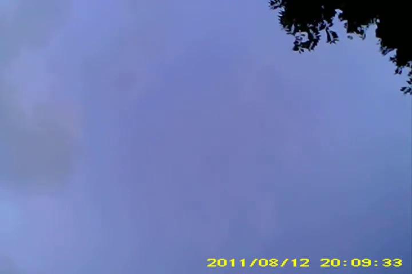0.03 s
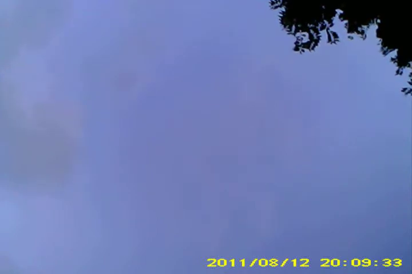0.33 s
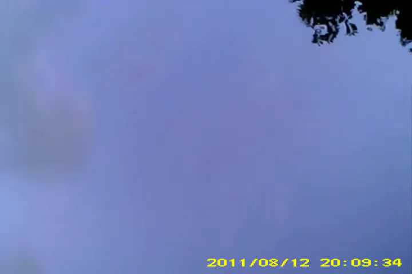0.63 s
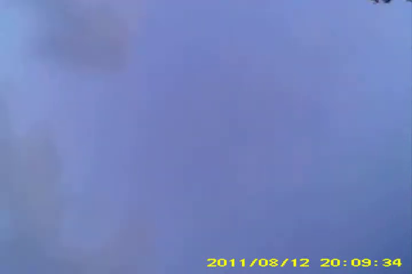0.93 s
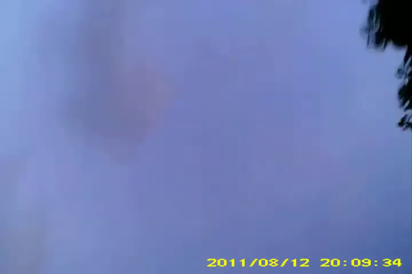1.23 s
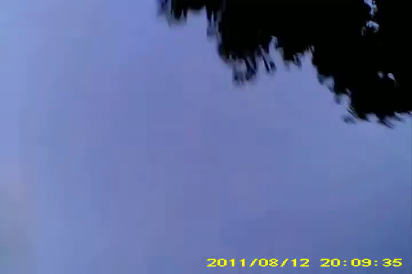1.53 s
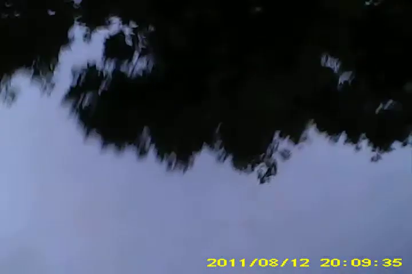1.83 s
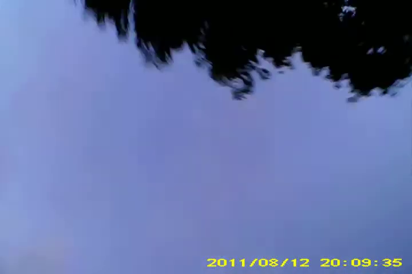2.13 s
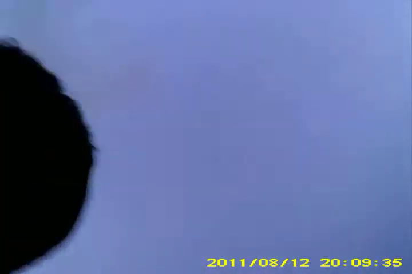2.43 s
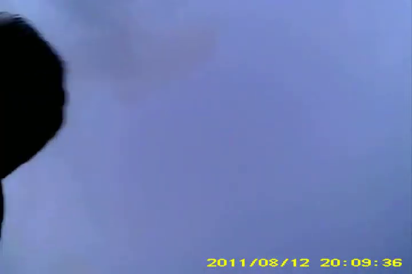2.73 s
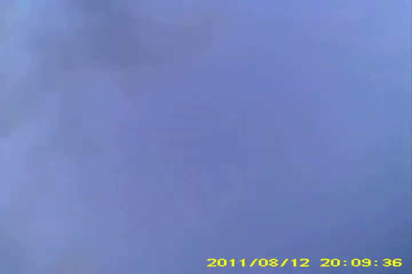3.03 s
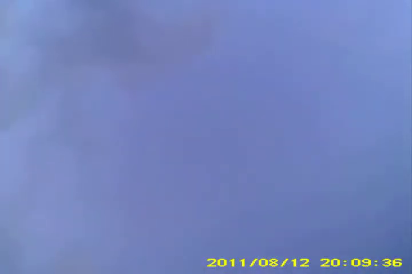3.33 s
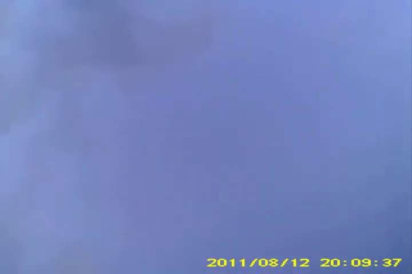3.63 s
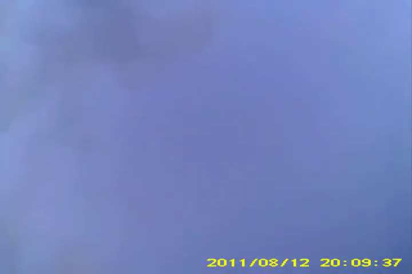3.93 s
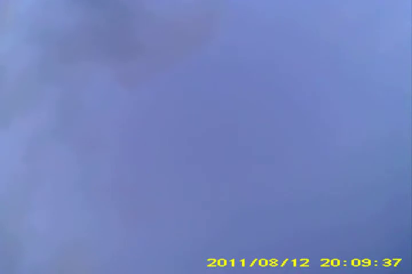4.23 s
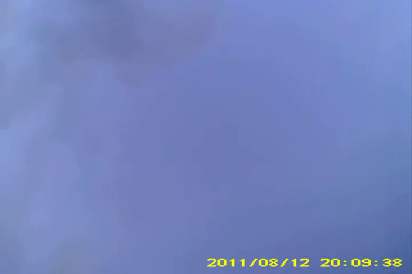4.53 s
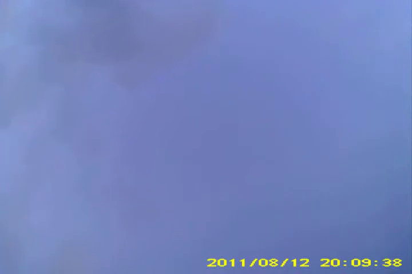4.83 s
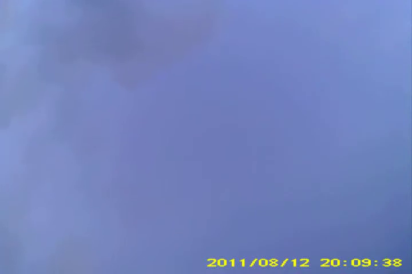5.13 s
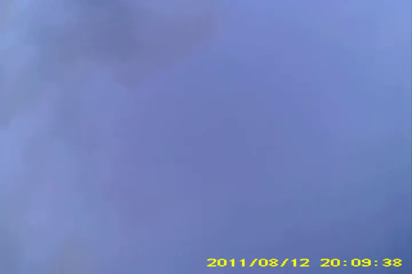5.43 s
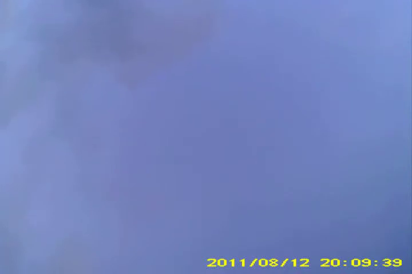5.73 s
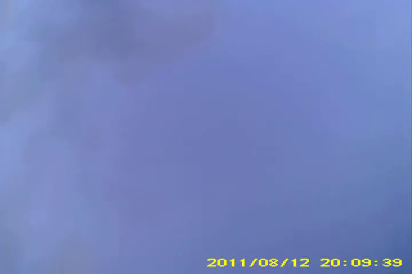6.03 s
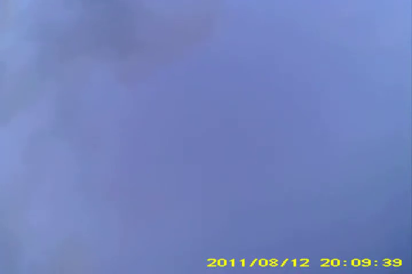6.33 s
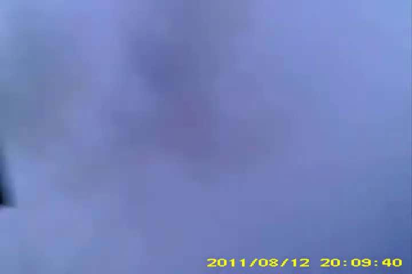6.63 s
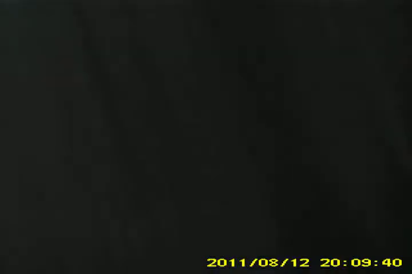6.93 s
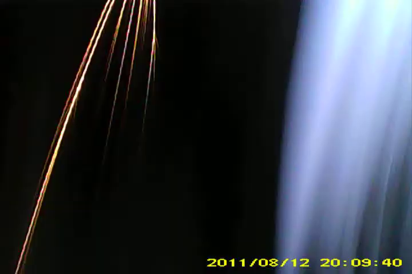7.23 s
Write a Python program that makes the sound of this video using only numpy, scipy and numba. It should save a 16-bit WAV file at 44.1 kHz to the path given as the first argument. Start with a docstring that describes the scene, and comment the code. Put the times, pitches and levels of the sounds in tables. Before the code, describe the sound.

A firework fuse flares close to a cheap microphone in the open air, over faint air noise and a distant low drone. Sharp pops pepper its hiss, then thin out, leaving a soft sizzle and a slowly swelling hollow tone. Suddenly the whistling rocket takes off, a harsh, distorted screech and roar that lasts under a second, cutting out briefly and weakening as it leaves.

```python
"""Outdoors, a whistling bottle rocket close to a cheap camera. The fuse catches, hisses and spits;
the flame creeps into the tube and rings it; the motor shrieks and roars away, with brief dips in level.
Soft air noise and a distant drone lie underneath. The camera rides its gain, overloads, and
samples so slowly that the shriek's overtones fold down into crossing glides."""
import sys
import numpy as np
from scipy import signal
from scipy.fft import rfft, irfft
from scipy.io import wavfile
from scipy.ndimage import map_coordinates
from numba import njit

SR = 44100
rng = np.random.default_rng(int(sys.argv[2]) if len(sys.argv) > 2 else 0)


def bounce(signal):
    """Save signal as a 16-bit WAV file at the path given by the first command-line argument."""
    frames = np.transpose(np.atleast_2d(signal))
    limited = np.clip(frames, -1, 1)
    pcm = np.round(limited * 32767).astype(np.int16)
    wavfile.write(sys.argv[1], SR, pcm)


N = 325017
T = np.arange(N) / SR
CATCH_S, LAUNCH_S = .218, 6.54
CAMERA_RATE_HZ = 8000

# tube resonances that colour the whistle: (frequency [Hz], gain [dB])
WHISTLE_COLOUR = [(1000, -10), (2100, 2), (3100, -13), (4150, -2), (4500, -0.5), (5300, 1), (5700, -8.5),
                  (6200, -17.5), (6750, -3), (7400, 3.5), (7900, -6.5), (8200, -16), (12000, -14.5)]
# exhaust spectrum: (frequency [Hz], gain [dB])
ROAR_COLOUR = [(30, 0), (150, 1.5), (600, 2.5), (1500, 4), (2500, 5), (3600, 4), (4000, 4)]

def motor():
    """The burning charge pulses in its tube: a shriek rich in overtones over the roar of the gas."""
    hz = whistle_pitch()
    whistle_gain, roar_gain = shriek_and_roar_gains()
    phase = 2 * np.pi * np.cumsum(hz * (1 + .0029 * walk(110))) / SR
    # harmonic 2 dominates each start; the wave steepens as the pitch settles
    steepness = np.interp(hz, [1140, 1220], [1, .25])
    # ground reflections smear each pulse; in free air the overtones line up into a spike
    smear_rad = np.interp(T, [6.95, 7.02], [.45, 0])
    whistle = 0
    for k in range(1, 14):
        gain = undb(np.interp(k * hz, *np.transpose(WHISTLE_COLOUR))) * (1 if k == 2 else steepness)
        whistle -= gain * np.cos(k * phase + smear_rad * k ** 2)
    roar = noise(ROAR_COLOUR) * undb(1.86 * walk(90))
    return whistle * whistle_gain * undb(2.4 * walk(78)) + roar * roar_gain


# whistle fundamental, before and after the restart: (time [s], pitch [Hz])
FIRST_SAG = [(6.575, 1112), (6.61, 1087), (6.67, 1063), (6.7, 1056), (6.78, 1049), (6.86, 1033),
             (6.955, 1018)]
SECOND_SAG = [(7.015, 1064), (7.037, 1048), (7.189, 1013), (7.257, 983), (7.36, 977)]
# whistle starts: (time [s], overshoot [Hz])
STARTS = [(6.527, 400), (6.972, 550)]

def whistle_pitch(settle_s=.014):
    """Pitch settles from above at each start, then sags as the cavity grows and the rocket leaves."""
    hz, = curves(list(FIRST_SAG) + list(SECOND_SAG))
    for start_s, overshoot_hz in STARTS:
        hz += (T >= start_s) * overshoot_hz * np.exp(-np.maximum(T - start_s, 0) / settle_s)
    return hz


# stretches of shriek and roar: (time [s], length [s], whistle [dB], roar [dB], fade [dB/s])
STRETCHES = [(6.528, 0.022, 10.5, 1.5, -5), (6.564, 0.38, 9.5, 10, 24), (6.957, 0.145, 1.5, 12.5, 94),
             (7.154, 0.05, -6.5, -6, 53), (7.244, 0.13, -5.5, -3.5, 5)]

def shriek_and_roar_gains(ignition_s=6.443, build_db_per_s=200, attack_s=.0032, release_s=.0049):
    """Gas builds up, then shriek and roar are heard in stretches, with brief dips between them."""
    started = T >= STRETCHES[0][0]
    building = (T > ignition_s) & ~started
    whistle, roar = started * undb(-15.5), started * undb(-10.5)  # floor of the dips
    roar += building * undb(-14 + build_db_per_s * building * (T - ignition_s))
    for start_s, length_s, whistle_db, roar_db, fade_db_per_s in STRETCHES:
        age_s = np.maximum(T - start_s, 0)
        envelope = np.minimum(age_s / attack_s, 1) * undb(-fade_db_per_s * np.minimum(age_s, length_s))
        envelope *= np.exp(-np.maximum(age_s - length_s, 0) / release_s)
        whistle = np.maximum(whistle, envelope * undb(whistle_db))
        roar = np.maximum(roar, envelope * undb(roar_db))
    return whistle, roar


# loud powder spits: (time [s], level [dB], pitch [Hz], length [ms])
SPITS = [(.161, -6, 495, 2.9), (0.626, 7, 1500, 6.4), (0.829, -7, 1670, 11), (.928, 6.5, 1294, 4.26),
         (0.985, 3.5, 1350, 6), (1.078, 4.5, 1120, 2), (1.105, 6, 1400, 3.1), (1.162, 4.5, 1060, 3.8),
         (1.203, -1, 570, 6), (1.213, 12.5, 2100, 1.66), (1.457, 8, 1580, 3.6), (1.474, 1, 1660, 5.8),
         (1.522, 7.5, 1060, 7.6), (1.569, 2.5, 2400, 4.7), (1.601, -1, 1590, 4.7), (1.68, 13.5, 1860, 1.7),
         (1.708, 6, 1800, 21.5), (1.739, 8, 1920, 18.5), (1.771, 6, 2000, 11), (1.819, 1, 1750, 6.5),
         (1.848, 3.5, 1700, 8.2), (1.873, 8, 1780, 3.8), (1.916, 9, 1280, 4.7), (1.966, 5, 1090, 4),
         (1.985, 10, 1140, 5.8), (2.033, 1, 1710, 28), (2.063, 6, 1690, 6), (2.074, 6.5, 690, 9.3),
         (2.169, 9.5, 1810, 2.4), (2.244, 2, 2000, 7.2), (2.323, 5, 1060, 9.2), (2.333, 13, 1570, 3.05),
         (2.358, 6, 1760, 9), (2.483, 7.5, 1470, 3.9), (2.545, 0.5, 2180, 4.1), (2.558, 8.5, 1500, 3),
         (2.771, 6.5, 1430, 2.2), (3.344, -0.5, 1500, 7), (3.376, 2, 1700, 4), (4.56, -16, 1600, 5.7),
         (5.9, -8.5, 1500, 11), (6.208, -5.5, 1500, 3.6)]

def spits(sputter_from_s=.9, sputter_to_s=2.85, crackles_per_s=18):
    """Powder pops in the fuse: loud spits, plus faint random crackles while it sputters."""
    span_s = sputter_to_s - sputter_from_s
    draws = rng.random((int(crackles_per_s * span_s), 3))
    crackles = [(sputter_from_s + when * span_s, -12 + 3 * size, 1500 * 2 ** (pitch - .5), 8)
                for when, size, pitch in draws]
    out = np.zeros(N)
    for start_s, db, hz, length_ms in SPITS + crackles:
        pop, i = spit(hz, length_ms), int(start_s * SR)
        out[i:i + len(pop)] += pop * undb(db)
    return out


# hollow launcher modes: (frequency [Hz], T60 [s], level [dB])
LAUNCHER_MODES = [(472, .16, -25), (360, 0.054, -26), (1210, 0.084, -30.5)]

def spit(hz, length_ms, width_hz=530, attack_s=.002, ceiling=1.54):
    """One grain goes off: a ragged, saturating puff with a sputtering tail rings the launcher."""
    t = T[:8192]
    burst = lowpass(rng.standard_normal(len(t)), 3120, order=4)
    burst = burst - lowpass(burst, 260)
    puff = unit(resonate(burst, np.full(len(t), float(hz)), width_hz)) + .51 * unit(burst)
    sputter = undb(8.1 * unit(lowpass(rng.standard_normal(len(t)), 230)))
    flame = np.exp(-(t * 1000 / length_ms) ** 2.6) + .074 * sputter * np.exp(-t / .014)
    pop = ceiling * np.tanh(.74 * puff * flame / ceiling) * (1 - np.exp(-t / attack_s))
    for mode_hz, t60_s, mode_db in LAUNCHER_MODES:
        detuned_hz = mode_hz * (1 + .034 * rng.standard_normal())
        pop += np.sin(2 * np.pi * detuned_hz * t) * undb(mode_db - 60 * t / t60_s)
    return pop


# fuse burn: (time [s], hiss [dB], rumble re hiss [dB], sizzle re hiss [dB])
FUSE_LEVELS = [(.28, -2, -14.5, -6), (.45, -3.5, -12, -6.5), (.64, -10, -14.5, -5), (.85, -15, -15.5, -4.5),
               (1.4, -17, -14.5, -4.5), (2.0, -10.5, -18, -9.5), (2.55, -17, -20, -7.5),
               (2.9, -16.5, -19, -4.5), (3.4, -17.5, -12.5, -2), (3.8, -20.5, -10.5, 3),
               (4.55, -19.5, -13.5, 3), (4.95, -19.5, -11.5, -5), (5.4, -22.5, -12.5, -6),
               (5.8, -25, -20, -3.5), (6.4, -21, -14, -1.5)]
# jet spectrum before the band split: (frequency [Hz], gain [dB])
JET_COLOUR = [(15, -40.5), (25, -11), (91, -10), (184, -10), (287, -8.5), (780, -3.5), (944, -4.5),
              (1050, -2.5), (1510, -5), (1820, 0), (2300, -9), (3100, -5), (3450, 0.5), (4000, 0.5),
              (5200, -41.5), (8800, -120)]

def fuse(flare_db=4, flare_s=.054):
    """A fluttering gas jet that flares as it catches: low rumble, mid hiss, top sizzle."""
    hiss_db, rumble_db, sizzle_db = curves(FUSE_LEVELS)
    jet = noise(JET_COLOUR)
    rumble, below_sizzle = lowpass(jet, 340), lowpass(jet, 3030, order=8)
    hiss, sizzle = below_sizzle - rumble, jet - below_sizzle
    gas = unit(hiss) + unit(rumble) * undb(rumble_db) + unit(sizzle) * undb(sizzle_db)
    burning = np.clip((T - CATCH_S) / .006, 0, 1) * np.clip((LAUNCH_S - T) / .02, 0, 1)
    catch_db = flare_db * np.exp(-((T - CATCH_S) / flare_s) ** 2)
    flutter_db = walk(34) + .6 * walk(360)
    return gas * burning * undb(hiss_db + catch_db + flutter_db)


# ring of the tube's mouth: (time [s], resonance [Hz], level [dB])
TUBE_RING = [(3.6, 1500, -24.5), (4.6, 1480, -22.5), (4.9, 1572, -19), (5.3, 1573, -15.5), (5.9, 1552, -12),
             (6.42, 1530, -11.5), (6.49, 1737, 0), (6.54, 1810, -5)]

def tube(width_hz=380., ceiling_re_rms=3.1):
    """The flame blows across the tube and rings its cavity in flutters, too weakly to lock into a tone."""
    hz, db = curves(TUBE_RING)
    ring = resonate(resonate(rng.standard_normal(N), hz, width_hz), hz, width_hz)
    ring = unit(ring * undb(2 * walk(36)))
    ring /= (1 + (np.abs(signal.hilbert(ring)) / ceiling_re_rms) ** 4) ** (1 / 4)  # saturation
    flame_inside = np.clip((T - 2.6) / .23, 0, 1) * np.clip((LAUNCH_S - T) / .01, 0, 1)
    return unit(ring) * flame_inside * undb(db)


# distant drone: (frequency [Hz], opening level [dB])
DRONE_TONES = [(91.5, -31), (145.3, -35.5)]
# air noise spectrum: (frequency [Hz], gain [dB])
AIR_COLOUR = [(30, -4.5), (90, -3), (200, -5.5), (420, -5.5), (900, -7), (1800, -4.5), (2600, -15.5),
              (4000, -14.5)]

def outdoors():
    """Soft air noise and a low drone, clear before the fuse catches and much fainter after."""
    drone = sum(np.sqrt(2) * undb(db) * np.sin(2 * np.pi * (hz * T + rng.random()))
                for hz, db in DRONE_TONES)
    drone_db = np.interp(T, [.22, .3, 2.6, 5.], [0, -11.5, -24.5, -25.5]) + walk(15)
    air_db = np.interp(T, [.22, .3], [-29, -39])
    return drone * undb(drone_db) + noise(AIR_COLOUR) * undb(air_db)


def undb(db):
    return 10 ** (np.asarray(db) / 20)


def unit(x):
    return x / np.sqrt(np.mean(x ** 2))


def curves(table):
    """Table columns, linearly interpolated over time."""
    times_s, *columns = np.transpose(table)
    return [np.interp(T, times_s, column) for column in columns]


def noise(colour):
    """Unit-RMS coloured noise, empty above the camera's band."""
    bins_hz = np.fft.rfftfreq(N, 1 / SR)
    hz, db = np.transpose(colour)
    gain = undb(np.interp(np.log(bins_hz + 1), np.log(hz), db)) * (bins_hz < CAMERA_RATE_HZ / 2)
    return unit(irfft(rfft(rng.standard_normal(N)) * gain, N))


def lowpass(x, hz, order=2):
    """Zero-phase low-pass."""
    return signal.sosfiltfilt(signal.butter(order, hz, fs=SR, output="sos"), x, padtype=None)


def walk(rate_hz):
    """Unit-RMS random drift."""
    return unit(lowpass(rng.standard_normal(N), rate_hz))


@njit
def resonate(x, hz, width_hz):
    """State-variable band-pass with a moving centre."""
    y, band_state, low_state = np.empty(len(x)), 0., 0.
    for i in range(len(x)):
        g, damping = np.tan(np.pi * hz[i] / SR), width_hz / hz[i]
        band = (band_state + g * (x[i] - low_state)) / (1 + g * (g + damping))
        band_state, low_state = 2 * band - band_state, low_state + 2 * g * band
        y[i] = damping * band
    return y


@njit
def follow(x, attack_s, release_s):
    """Envelope follower."""
    y, level = np.empty(len(x)), 0.
    for i in range(len(x)):
        level += (abs(x[i]) - level) / (SR * (attack_s if abs(x[i]) > level else release_s))
        y[i] = level
    return y


def scene():
    """Rocket and background, mono."""
    return (fuse() + tube() + spits() + motor() + outdoors())[None]


def record(dry):
    """Camera: gain control ducks after each spit and swells back; slow sampling aliases; peaks clip."""
    target, deepest_cut_db, top_hz = .5, -13, 15800
    envelope = follow(dry[0], attack_s=.00028, release_s=.12)
    ducked = dry[0] * np.clip(target / (envelope + 1e-6), undb(deepest_cut_db), 1)
    # no anti-alias filter: everything above half the rate mirrors down
    samples = map_coordinates(ducked, [np.arange(0, N + SR / 100, SR / CAMERA_RATE_HZ)], order=3)
    samples = np.clip(samples, -.69, .69)
    smoothing = signal.firwin(30 * 441 + 1, 4020, fs=441 * CAMERA_RATE_HZ, window=("kaiser", 8))
    upsampled = signal.resample_poly(samples, 441, 80, window=smoothing)[:N]
    clipped = np.clip(upsampled, -.725, .725)
    return signal.sosfilt(signal.ellip(10, .2, 70, top_hz, fs=SR, output="sos"), clipped)[None]


dry = scene()
out = record(dry)
bounce(out)
```